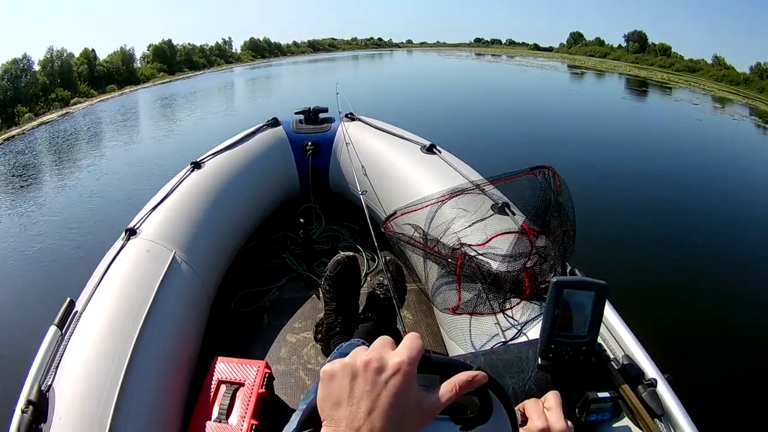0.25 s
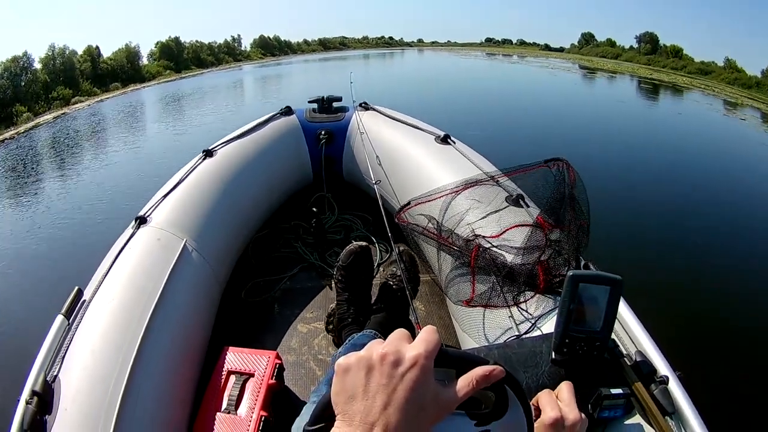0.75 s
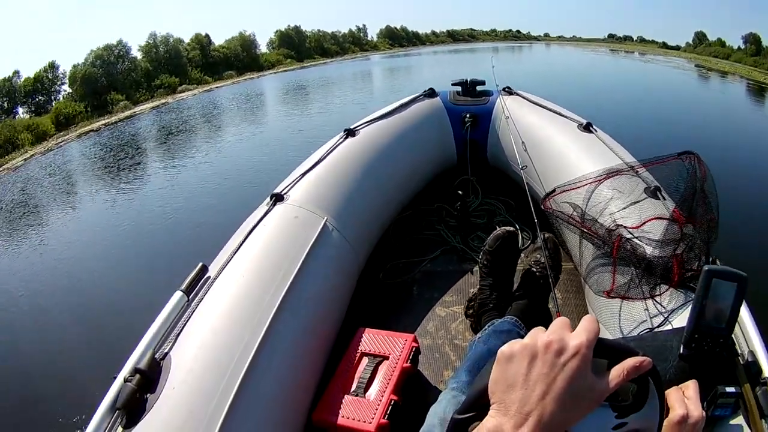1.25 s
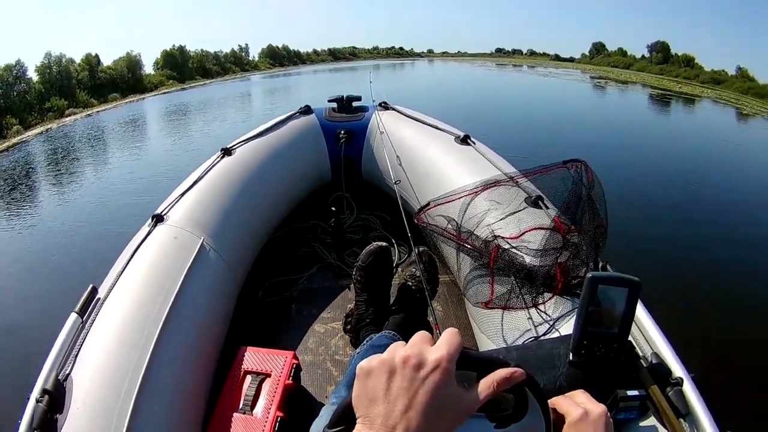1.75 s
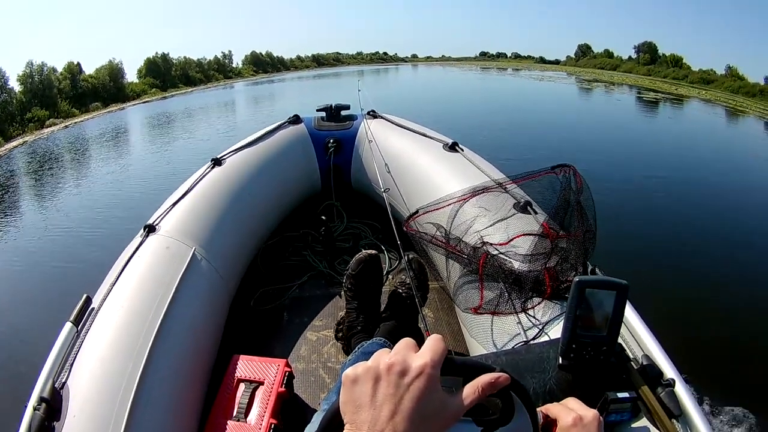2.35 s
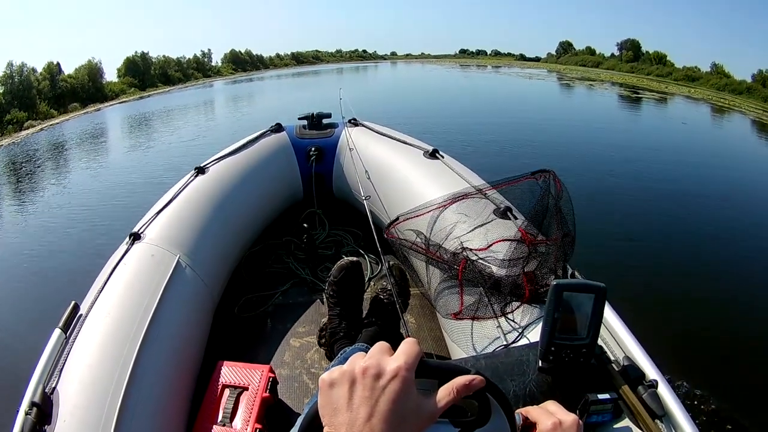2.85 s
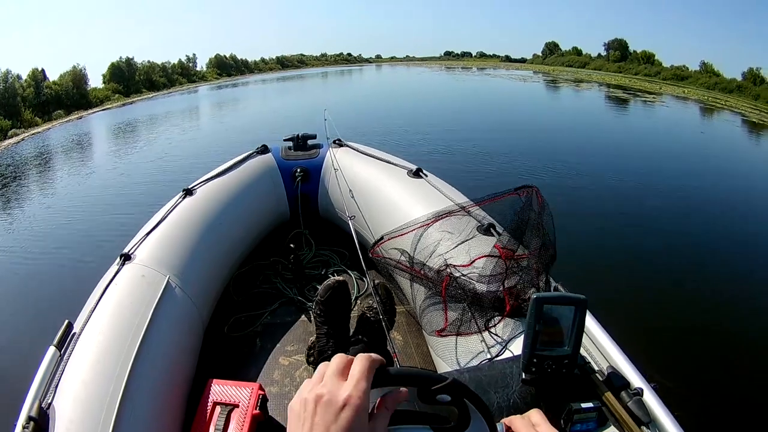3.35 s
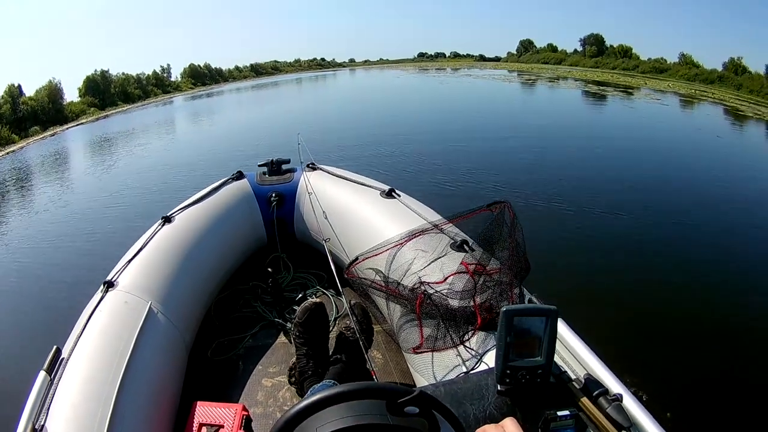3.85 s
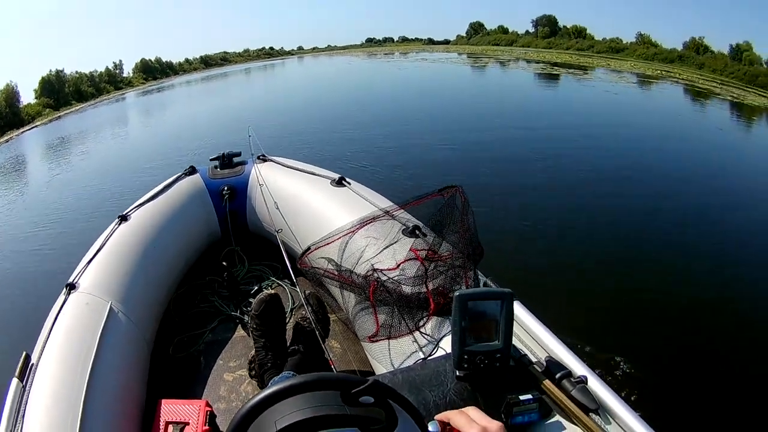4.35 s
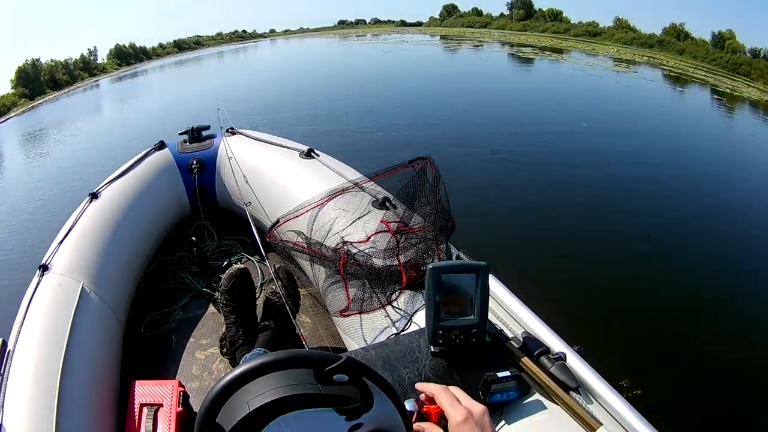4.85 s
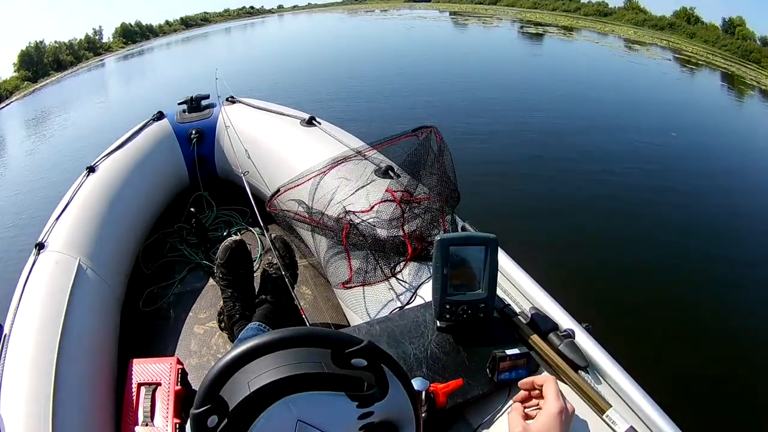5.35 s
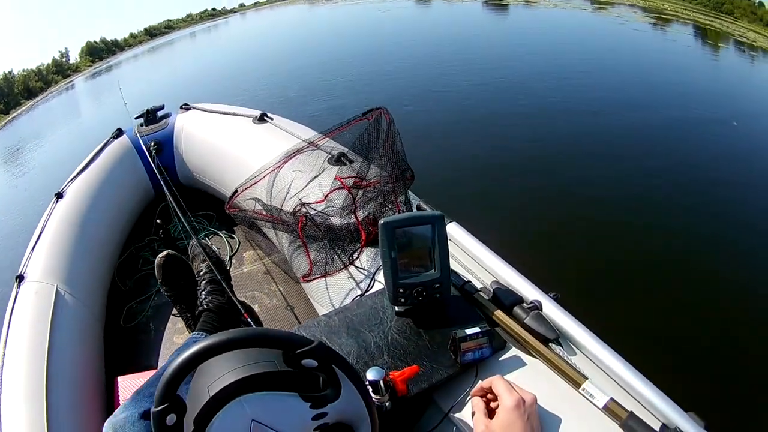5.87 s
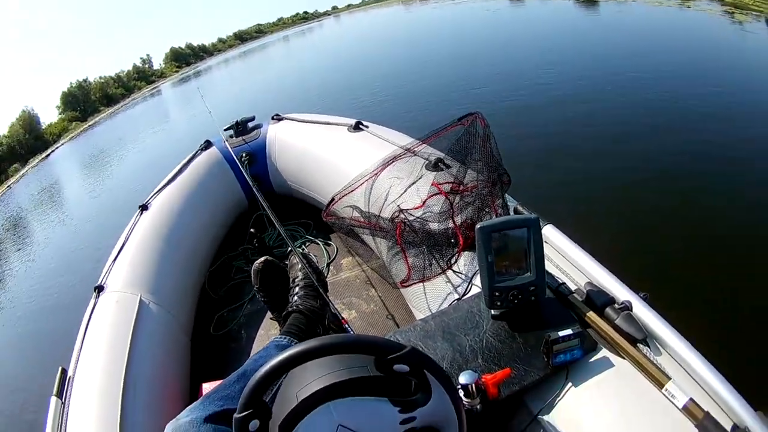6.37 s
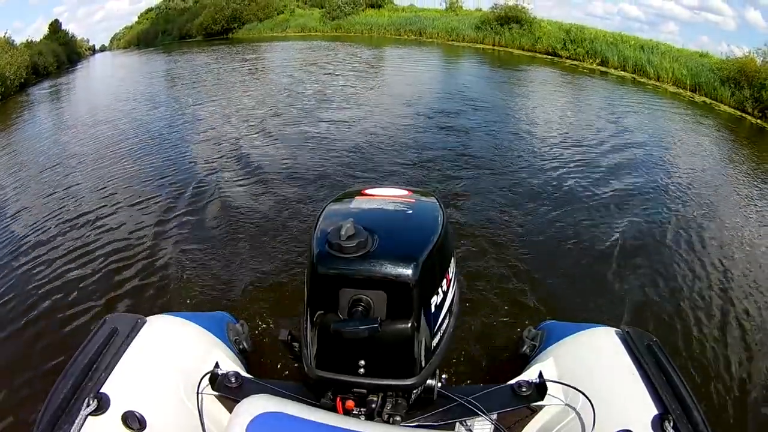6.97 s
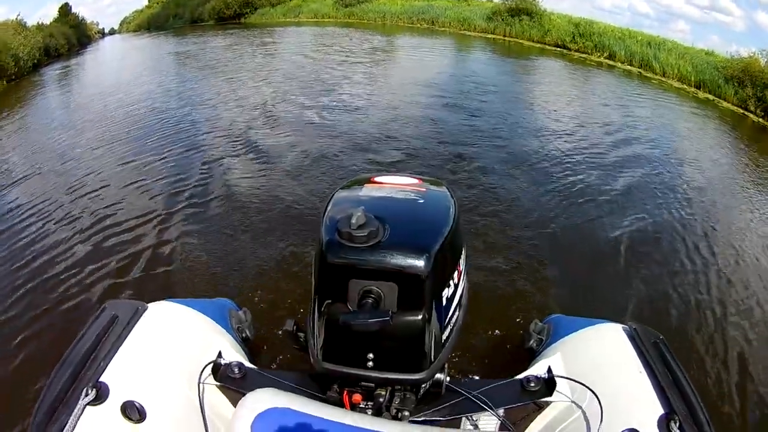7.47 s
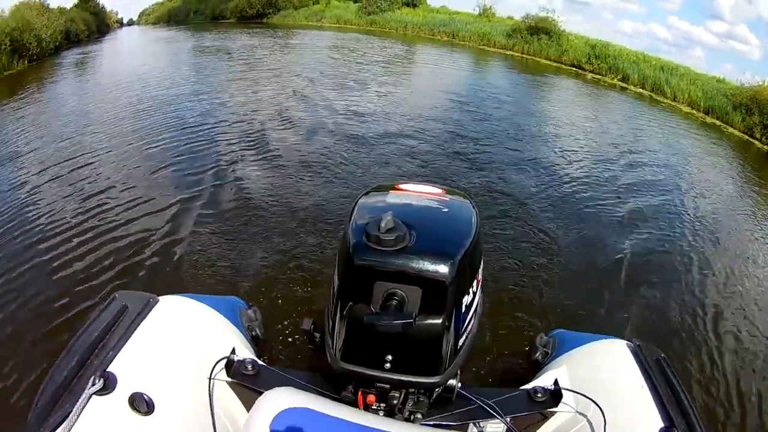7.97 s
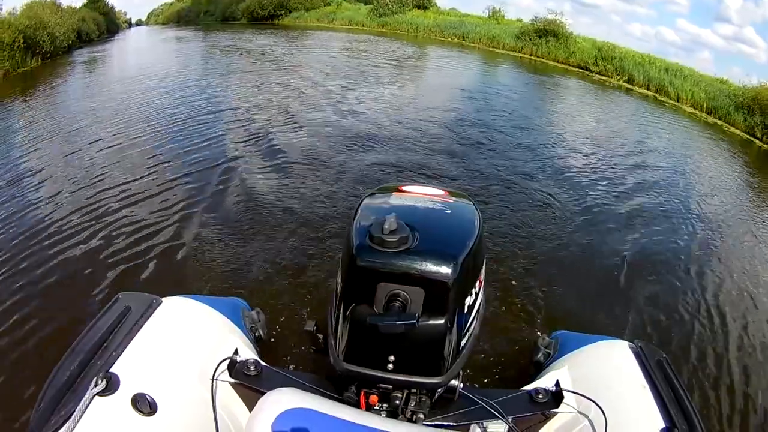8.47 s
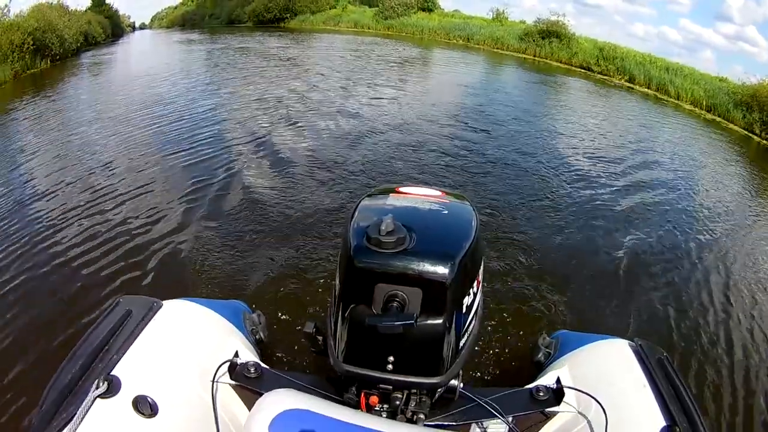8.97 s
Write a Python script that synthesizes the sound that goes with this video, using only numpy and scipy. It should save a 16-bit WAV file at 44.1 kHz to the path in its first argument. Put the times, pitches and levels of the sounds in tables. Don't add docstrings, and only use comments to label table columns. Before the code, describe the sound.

On an open river, a small four-stroke outboard on an inflatable boat runs loudly, with a buzzing drone, metallic clatter, gear whine, knocking exhaust bubbles and hull boom over wind and wake rumble. Pitch and loudness sink as the throttle eases. Then it cuts abruptly to a far quieter idle: rapid valve ticks, ringing cowl and faint hum. The microphone is close and muffled by a sealed case.

```python
import sys
import numpy as np
from scipy import signal
from scipy.io import wavfile

SR = 44100
rng = np.random.default_rng(int(sys.argv[2]) if len(sys.argv) > 2 else 0)


def output_pcm(signal):
    pcm = np.clip(np.atleast_2d(signal).T, -1, 1) * 32767
    wavfile.write(sys.argv[1], SR, np.round(pcm).astype(np.int16))


def voltage_ratio(level):
    return 10 ** (np.asarray(level, float) / 20)


N = 406602
T = np.arange(N) / SR
CHANGE_S = 6.7063

# time_s, rate_hz
SLOWING = [(0.0, 33.314), (0.75, 30.776), (1.0, 30.454), (1.5, 29.071), (3.25, 27.277), (3.5, 27.004),
           (4.75, 25.727), (5.0, 25.189), (5.5, 23.744), (5.75, 23.175), (6.0, 22.123), (6.5, 20.455),
           (6.72, 19.951)]
STAGES_HZ = [21.46, 24.57, 30.4]


def evened(x):
    return x / np.sqrt(np.mean(x ** 2) + 1e-20)


def noise():
    return rng.standard_normal(N)


def columns(rows):
    time_s, *values = np.transpose(rows)
    return [np.interp(T, time_s, v) for v in values]


def wander(rate_hz):
    knots = rng.standard_normal(int(N / SR * 2 * rate_hz) + 2)
    return evened(np.interp(T * 2 * rate_hz, np.arange(len(knots)), knots))


def colour(x, points, rings=()):
    hz = abs(np.fft.fftfreq(8192, 1 / SR)) + 1
    point_hz, point_db = np.transpose(points)
    db = np.interp(np.log(hz), np.log(point_hz), point_db)
    for at_hz, width_hz, lift_db in rings:
        db = db + lift_db / (1 + (2 * (hz - at_hz) / width_hz) ** 2)
    log_gain = np.log(voltage_ratio(np.maximum(db, -100)))
    taps = np.fft.ifft(np.exp(np.conj(signal.hilbert(log_gain)))).real[:4096]
    return signal.oaconvolve(x, taps)[:N]


def resonate(x, hz, width_hz):
    r = np.exp(-np.pi * width_hz / SR)
    pole = r * np.exp(2j * np.pi * hz / SR)
    return 2 * signal.lfilter([1 - r], [1, -pole], x).real


def swell(train, hz, width_hz):
    for _ in range(3):
        train = resonate(train, hz, width_hz)
    return evened(train)


def split(body, treble, hz):
    low = signal.butter(4, hz, "low", fs=SR, output="sos")
    high = signal.butter(4, hz, "high", fs=SR, output="sos")
    return signal.sosfilt(low, body) + signal.sosfilt(high, treble)


def cycles(rate_rows, start_cycles):
    running = T >= rate_rows[0][0]
    return start_cycles + np.cumsum(columns(rate_rows)[0] * running) / SR


def blows(turns, angle, spread_db, jitter):
    whole = np.arange(np.floor(turns[0]), turns[-1])
    chance = np.clip(rng.standard_normal((len(whole), 2)), -2, 2)
    at = np.searchsorted(turns, whole + angle + jitter * chance[:, 0])
    train = np.zeros(N + 1)
    train[at] = voltage_ratio(spread_db * chance[:, 1]) * (at > 0)
    return train[:N]


def rattle(train, decay_s, rough, habits=0):
    envelope = signal.lfilter([1], [1, -np.exp(-1 / (decay_s * SR))], train)
    burst = envelope * (noise() + habits)
    return (1 - rough) * evened(train) + rough * evened(burst)


def habit(turns, count=300):
    patterns = rng.standard_normal((2, count))
    angle = np.linspace(0, 1, count, endpoint=False)
    first, second = (np.interp(turns, angle, p, period=1) for p in patterns)
    drift = 1.2 * wander(1.2)
    return evened(np.cos(drift) * first + np.sin(drift) * second)


def ping(turns, angle, hz, width_hz, spread_db):
    return swell(blows(turns, angle, spread_db, .002), hz, 1.5 * width_hz)


def answer(hz, modes):
    power = 0
    for at_hz, width_hz, db in modes:
        power = power + (voltage_ratio(db) / (1 + (2 * (hz - at_hz) / width_hz) ** 2)) ** 2
    return np.sqrt(power)


def blub(from_hz, to_hz, length_s):
    u = np.arange(0, 1, 1 / (length_s * SR))
    phase = 2 * np.pi * np.cumsum(from_hz + (to_hz - from_hz) * u) / SR
    return np.sin(np.pi * u) ** 2 * np.sin(phase)


def transom_shake(turns, speed_hz):
    # centre_hz, width_hz, level_db
    transom = [(49, 2.2, -44), (48.4, 2, -36), (54.6, 4.8, -32), (61.7, 15, -35), (65.1, 6.3, -27.5),
               (137, 7.8, -27.5), (181.2, 31, -30.5), (199.7, 14, -28.5), (216, 5.7, -22.5),
               (229.5, 11, -24)]
    wheel = 2 * np.pi * turns
    second, seventh = (answer(k * speed_hz, transom) for k in (2, 7))
    low = second * (np.cos(2 * wheel + 4.16) + 0.79 * np.cos(4 * wheel + 5.15))
    return np.sqrt(2) * (low + voltage_ratio(-3.0) * seventh * np.cos(7 * wheel + 5.8))


def gear_whine(turns, speed_hz):
    # centre_hz, width_hz, level_db
    gear_case = [(579, 17, -40), (678, 27, -42), (749, 60, -42), (812, 120, -32.5), (845, 60, -28),
                 (1112, 42, -38), (1360, 15, -46.5), (1400, 80, -56.5)]
    wheel = 2 * np.pi * turns
    mesh, whine = (answer(k * speed_hz, gear_case) for k in (26, 49))
    load = 1 + 0.48 * np.cos(wheel - 3.2)
    blur = 1.1 * wander(9.)
    gear = load * (mesh * np.cos(26 * wheel + 0.42 * wander(7.2)) + whine * np.cos(49 * wheel + blur))
    side_line = .4 * np.clip((31 - speed_hz) / 2, 0, 1) * mesh * np.cos(27 * wheel - 3.2)
    return np.sqrt(2) * (gear + side_line)


def knock_db(speed_hz):
    # start_s, length_s, level_db
    runs = [(0.085, 0.011, -14.5), (.36, 0.074, -26), (0.583, 0.059, -20.5), (0.832, 0.11, -21.5),
            (1.057, 0.13, -23.5), (1.327, 0.15, -23), (1.552, 0.16, -21.5), (1.784, .01, -27),
            (1.82, 0.037, -22.5), (2.205, 0.075, -25.5), (2.324, .08, -22), (2.682, 0.023, -23),
            (2.776, .01, -21.5), (2.837, 0.045, -22.5), (2.965, 0.036, -21.5), (3.24, 0.047, -19.5),
            (3.413, 0.078, -19.5), (3.556, 0.1, -25.5), (3.724, 0.056, -22.5), (3.854, 0.091, -23),
            (4.1, 0.3, -22.5), (4.44, 0.19, -24), (4.69, 0.0088, -18), (4.75, 0.049, -23.5),
            (4.864, 0.055, -26.5), (5.056, .01, -26), (5.14, .01, -27.5), (5.101, 0.0088, -18.5),
            (5.354, .01, -25)]
    drown_db_per_s, ring_s = 427, 0.01
    levels_db = []
    for start_s, length_s, db in runs:
        outside_s = np.maximum(np.maximum(start_s - T, T - start_s - length_s - ring_s), 0)
        levels_db.append(db - drown_db_per_s * outside_s)
    drowned_db = -33 - 5.6 * np.maximum(25.0 - speed_hz, 0)
    return np.maximum(np.max(levels_db, axis=0), drowned_db)


def exhaust(turns, speed_hz):
    knock = blows(turns, .9, 1.2, .002)
    knock = evened(signal.oaconvolve(knock, blub(274.0, 388.0, .015))[:N])
    putt = swell(blows(turns, .26, .8, .003), 121, 72.)
    putt_db = -27 - 13.5 * np.maximum(speed_hz - 20.8, 0)
    return voltage_ratio(knock_db(speed_hz) - 5.5) * knock + voltage_ratio(putt_db) * putt


def hull_boom(turns, speed_hz):
    # centre_hz, width_hz, planing_db, settled_db
    hull_modes = [(121.3, 29.7, -2.5, 8), (155.7, 35.8, 5.5, -5), (215.5, 38, 0, -8)]
    # rate_hz, level_db
    hull_level = [(20, -37), (21.5, -33.5), (23, -30), (27.5, -26.5), (28.7, -32.5), (29.3, -33.5),
                  (33, -37)]
    strokes = blows(turns, .9, 1.5, .003) - .4 * blows(turns, .4, 1.5, .003)
    settled = np.clip((26.5 - speed_hz) / 6.9, 0, 1)
    boom = 0
    for hz, width_hz, planing_db, settled_db in hull_modes:
        mode = resonate(resonate(strokes, hz, 2 * width_hz), hz, width_hz)
        boom = boom + voltage_ratio(planing_db + (settled_db - planing_db) * settled) * mode
    boom = evened(boom)
    boom = split(boom, 0 * boom, 1200)
    return voltage_ratio(np.interp(speed_hz, *np.transpose(hull_level))) * boom


def clatter(turns, speed_hz):
    # crank_angle (0-1), body_db, treble_db
    blow_rows = [(.03, -6, 0), (.16, -6, -6), (.29, -10, -9), (.45, -2, -9), (.53, 0, -1), (.66, -6, -7),
                 (.78, -9, -12), (.9, -10, -18)]
    # freq_hz, level_db
    loose_curve = [(100, -9), (700, -5), (1800, -2), (4000, 0)]
    # freq_hz, level_db
    slow, easing, fast = [(120, -35.5), (200, 1), (241, 1.5), (349, 0.5), (420, -3.5), (778, -5.5),
                          (1040, -5.5), (1900, -15.5), (2510, -22.5), (3370, -29.5), (4120, -32),
                          (8000, -55), (10400, -83), (17600, -120)], [(120, -39), (200, -14), (338, -3.5), (571, -13.5), (853, -14),
                                        (1010, -13), (1200, -13), (1930, -30), (2440, -29), (2670, -33.5),
                                        (4590, -48.5), (8000, -66.5), (10400, -105), (17600, -120)], [(120, -33), (200, -3), (490, -5.5), (529, -8.5),
                                                        (667, -16.5), (840, -7), (936, -16), (1490, -22.5),
                                                        (1930, -31.5), (2800, -42), (4310, -50.5),
                                                        (8000, -74), (10400, -106), (17600, -120)]
    # centre_hz, width_hz, lift_db
    slow_rings, easing_rings, fast_rings = [(515, 39, 0.75), (1013, 54, 8.1), (1440, 200, 6),
                                            (2605, 200, 9.7), (3080, 28, 2.2), (4000, 45, 3.5),
                                            (3900, 200, 3)], [(888, 24, 10), (1208, 11, 7.6),
                                                                (1324, 23, 9.7), (1632, 100, 7.2),
                                                                (2430, 110, 7.9), (2800, 45, 4),
                                                                (2940, 41, 7.9), (3830, 130, 7.5)], [(544, 18, 4.5),
                                                                                      (870, 7, 0.5),
                                                                                      (1190, 5.8, 6),
                                                                                      (1590, 250, 1),
                                                                                      (2540, 210, 7.5),
                                                                                      (2796, 88, 9.5),
                                                                                      (3070, 37, 9.5),
                                                                                      (3860, 150, 2)]
    body = treble = 0
    for angle, body_db, treble_db in blow_rows:
        train = -blows(turns, angle, 1.8, .003)
        body = body + voltage_ratio(body_db) * train
        treble = treble + voltage_ratio(treble_db) * train
    crisp = np.interp(speed_hz, STAGES_HZ, [.22, .42, .62])
    habits = .3 * habit(turns) * (1 + .5 * np.cos(2 * np.pi * (turns - .5)))
    thin = split(.45 * body, body, 480)
    clean = split(crisp * evened(thin), .25 * evened(treble), 2000) + habits
    loose = split(.8 * rattle(body, .008, 1), rattle(treble, .006, 1), 2000) + .9 * noise()
    struck = clean + 1.15 * colour(loose, loose_curve)
    stages = [(slow, slow_rings), (easing, easing_rings), (fast, fast_rings)]
    casing = 0
    for share, (spectrum, rings) in zip(np.eye(len(stages)), stages):
        casing = casing + np.interp(speed_hz, STAGES_HZ, share) * evened(colour(struck, spectrum, rings))
    return casing


def small_part_pings(turns, speed_hz):
    # crank_angle (0-1), freq_hz, width_hz, slow_db, easing_db, fast_db
    ping_rows = [(.2, 1230, 100, -52, -41, -51), (.42, 1150, 100, -54, -46, -47),
                 (.5, 865, 70, -56, -44, -52), (.44, 1560, 160, -56, -54, -47),
                 (.08, 2450, 160, -58, -53, -66), (.42, 430, 220, -40, -52, -60),
                 (.15, 1060, 60, -44, -56, -60), (.5, 560, 200, -60, -50, -38)]
    total = 0
    for angle, hz, width_hz, *stage_db in ping_rows:
        level_db = np.interp(speed_hz, STAGES_HZ, stage_db)
        total = total + voltage_ratio(level_db) * ping(turns, angle, hz, width_hz, 2.6)
    return total


def gusts(level_db):
    # freq_hz, level_db
    wind_curve = [(10, -10), (40, 0), (90, -3), (200, -10), (500, -24), (1500, -55), (20000, -100)]
    # centre_s, half_length_s, lift_db
    puffs = [
        (0.491, .6, -3),
        (5.7, .3, 1),
        (7.05, .3, -1.5),
        (8.58, .06, 5),
        (9.055, 0.06, 9),
    ]
    lumps_db = 1.1 * wander(9.)
    puffs_db = sum(db * np.exp(-((T - s) / half_s) ** 2) for s, half_s, db in puffs)
    return voltage_ratio(level_db + lumps_db + puffs_db) * evened(colour(noise(), wind_curve))


def under_way():
    # time_s, effort_db
    effort = [(0, 1), (1.1, 0.36), (2.0, -2), (2.7, -3.5), (3.7, -6), (4.2, -7.5), (4.9, -7.5), (5.8, -7),
              (6.7, -8)]
    turns = cycles(SLOWING, -.85)
    speed_hz, effort_db = columns(SLOWING)[0], columns(effort)[0]
    chuff = 1 + .06 * np.clip((23.5 - speed_hz) / 2, 0, 1) * np.cos(2 * np.pi * turns - 3.3)
    casing = voltage_ratio(-23.5 + effort_db) * chuff * clatter(turns, speed_hz)
    upper = gear_whine(turns, speed_hz) + casing + small_part_pings(turns, speed_hz)
    shadow = .65 * np.exp(-((T - 5.36) / .12) ** 2)
    upper = upper - shadow * resonate(upper, 710, 240)
    engine = transom_shake(turns, speed_hz) + exhaust(turns, speed_hz) + hull_boom(turns, speed_hz) + upper
    return engine + gusts(-27 + 1.37 * effort_db + 1.3 * wander(3.))


def fine_treble():
    # time_s, level_db
    snaps = [
        (2.2484, -52.5),
        (2.9285, -59.5),
        (6.7057, -45),
        (6.9216, -56),
        (7.8596, -54),
        (7.9575, -71),
        (8.3304, -67),
        (9.0757, -72),
        (9.1704, -62),
    ]
    caught = np.clip((24.0 - columns(SLOWING)[0]) / 2.8, 0, 1) * (T < CHANGE_S)
    fizz = resonate(resonate(noise(), 9500, 2100), 9500, 2100)
    clicks = np.zeros(N)
    for s, db in snaps:
        clicks[round(s * SR)] = voltage_ratio(db + 8.0)
    return voltage_ratio(-82.5) * caught * evened(fizz) + signal.lfilter([1, -1], [1, -.6], clicks)


def valve_gear(turns):
    # crank_angle (0-1), level_db, rattle_s, cowl_db, treble_db
    tick_rows = [
        (.99, 0, .007, -13, -.5),
        (.09, -9, .008, -14, -9),
        (.19, -3, .008, -6, -7),
        (.3, -13, .006, -18, -11),
        (.535, -2, .007, -18, -6),
        (.63, -7, .006, -12, -6),
        (.72, -8, .011, 0, -5),
        (.8, -8, .008, -2, -6),
        (.9, -10, .006, -14, -9),
    ]
    # freq_hz, level_db
    idle_curve = [(59, -37), (100, -2.5), (180, -2), (232, -2), (284, -4.5), (403, -7.5), (626, -11),
                  (1050, -4), (1150, -11), (1480, -3), (1780, -18.5), (3260, -30.5), (3640, -34.5),
                  (8000, -63), (10400, -107), (17600, -120)]
    # centre_hz, width_hz, lift_db
    idle_rings = [(409, 28, 8), (1026, 37, -4), (1343, 19, 10.5), (1660, 80, 4.5), (1985, 45, 10.5),
                  (2364, 34, 9.5), (2695, 300, 8), (3580, 120, 11), (4010, 230, 9.5)]
    ticks = .6 * noise() + .55 * habit(turns, count=900)
    treble = .7 * noise() + .55 * habit(turns, count=900)
    strikes = .1 * noise()
    habits = 1.6 * habit(turns, count=3000)
    for angle, db, decay_s, cowl_db, treble_db in tick_rows:
        train = blows(turns, angle, 1., .004)
        tick = rattle(train, decay_s, .75, habits)
        ticks = ticks + voltage_ratio(db) * tick
        treble = treble + voltage_ratio(treble_db) * tick
        strikes = strikes + voltage_ratio(cowl_db) * (evened(train) + 0.34 * tick)
    return colour(split(ticks, treble, 3460.0), idle_curve, idle_rings), strikes


def cowl_ring(strikes):
    return resonate(resonate(resonate(strikes, 1044, 41.0), 1040, 71.0), 960, 300.)


def idle_hum(turns):
    return np.cos(2 * np.pi * 22 * turns + .5 * wander(5.1))


def idle_knock(turns):
    return signal.oaconvolve(blows(turns, .355, 1.2, .006), blub(270., 500., .018))[:N]


def idle_pings(turns):
    # crank_angle (0-1), freq_hz, width_hz, level_db
    idle_ping_rows = [(.985, 1420, 170, 0), (.18, 1400, 150, -3), (.23, 1240, 130, -6),
                      (.535, 1430, 140, 0), (.59, 1260, 130, -5), (.68, 1530, 170, -6),
                      (.83, 1360, 150, -7), (.7, 1050, 45, 0), (.03, 1030, 70, -5), (.985, 700, 250, -7),
                      (.985, 3650, 250, -15), (.17, 2500, 300, -13), (.55, 3620, 60, -19),
                      (.7, 3680, 70, -21)]
    return sum(voltage_ratio(db) * ping(turns, angle, hz, width_hz, 1.2) for angle, hz, width_hz, db in idle_ping_rows)


def idle_sizzle(turns):
    # crank_angle (0-1), level_db
    sizzle_rows = [
        (.985, -2),
        (.16, 0),
        (.3, -8),
        (.54, -4),
        (.7, -5),
        (.85, -9),
    ]
    bright = sum(voltage_ratio(db) * blows(turns, angle, 3.5, .008) for angle, db in sizzle_rows)
    return swell(rattle(bright, .006, .85) + .45 * noise(), 6300, 2600)


def idling():
    # time_s, rate_hz
    idle_speed = [(6.7, 10.638), (7.1, 10.779), (7.5, 10.618), (7.9, 10.546), (8.3, 10.819), (8.7, 10.779),
                  (9.22, 10.381)]
    # time_s, facing (0-1)
    facing_curve = [(6.75, 0), (7.15, 0), (7.3, 0.3), (7.45, 0.95), (8.4, 0.9), (9.0, 0.87), (9.2, 1.06)]
    turns = cycles(idle_speed, -1.23)
    facing = columns(facing_curve)[0]
    valves, strikes = valve_gear(turns)
    # turned_away_db, gain_when_facing_db, layer
    layers = [(-41, 3.23, valves),
              (-57, 13.8, cowl_ring(strikes)),
              (-48, 5.3, idle_hum(turns)),
              (-47.5, -2.9, idle_knock(turns)),
              (-48.5, 5, idle_pings(turns)),
              (-77, 2, idle_sizzle(turns))]
    motor = sum(voltage_ratio(db + gain_db * facing) * x / np.std(x[T > CHANGE_S]) for db, gain_db, x in layers)
    return motor + gusts(-47.5 + 1.6 * facing)


def scene():
    jump = np.clip((T - CHANGE_S) / .0004, 0, 1)
    fade_in = np.clip(T / 0.00011, 0, 1)
    fade_out = np.clip((T[-1] - T) / 0.0012, 0, 1)
    return (fade_in * (1 - jump) * under_way() + jump * fade_out * idling())[None]


def band_limit(x):
    return signal.sosfilt(signal.butter(12, 15740, fs=SR, output="sos"), x)


def record(dry):
    # centre_hz, width_hz, lift_db
    case_modes = [(4420, 1000, 4.5), (5250, 390, -3), (6660, 2420, 2), (7840, 550, -15)]
    # freq_hz, level_db
    hiss_curve = [(4590, -31), (7800, -2.5), (11800, -3.5), (15100, -1.5), (15900, -1.5)]
    housed = colour(dry[0], [(1, 0), (SR, 0)], case_modes) + fine_treble()
    hiss = voltage_ratio(-77.5) * evened(colour(noise(), hiss_curve))
    return band_limit((housed + hiss)[None])


dry = scene()
out = record(dry)
output_pcm(out)
```